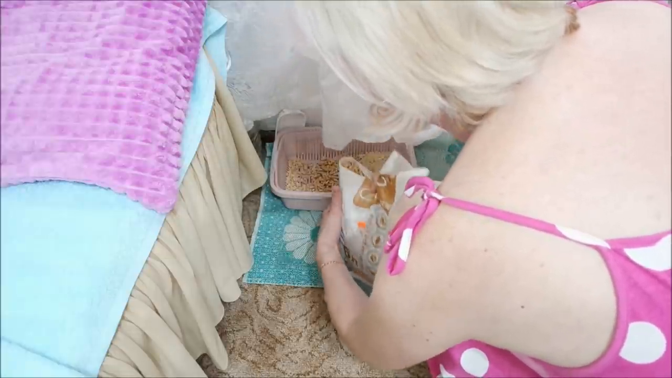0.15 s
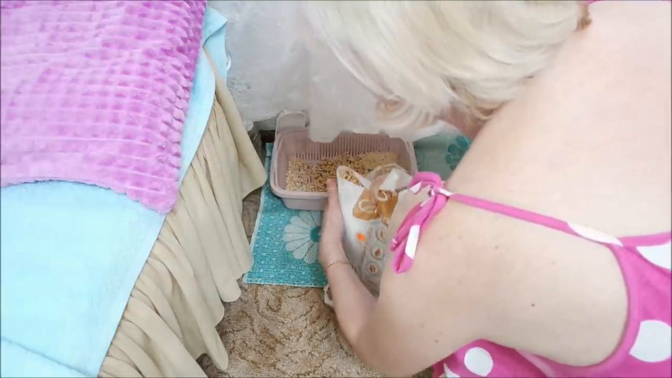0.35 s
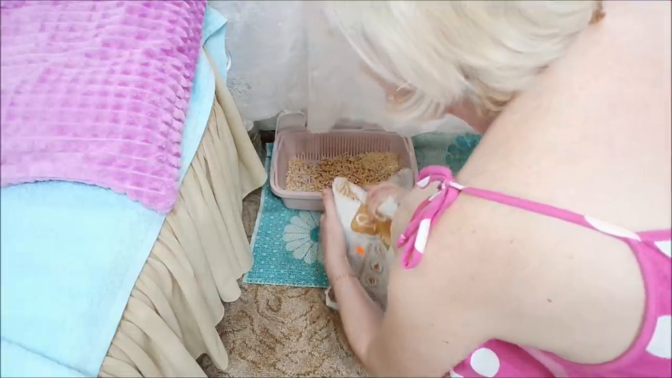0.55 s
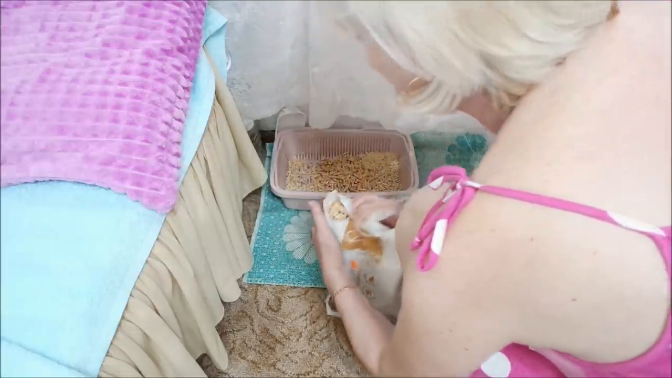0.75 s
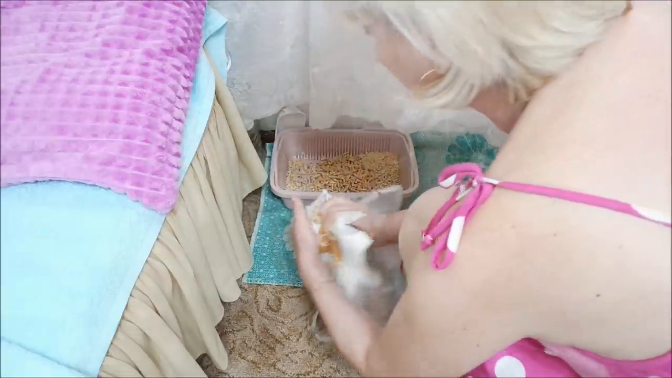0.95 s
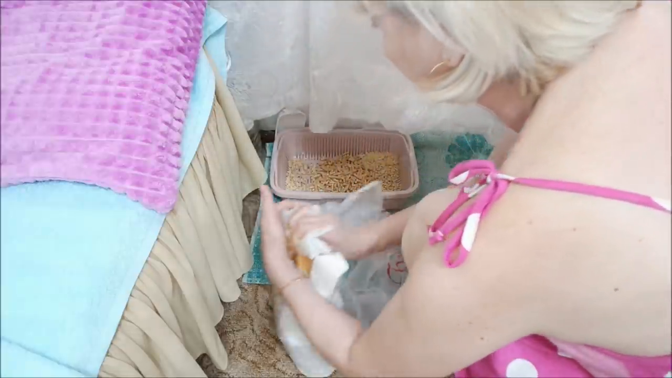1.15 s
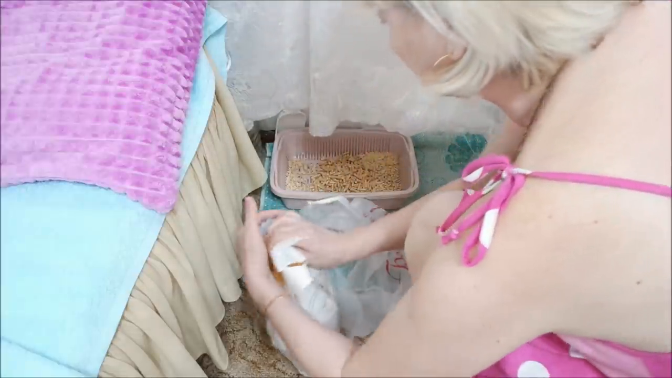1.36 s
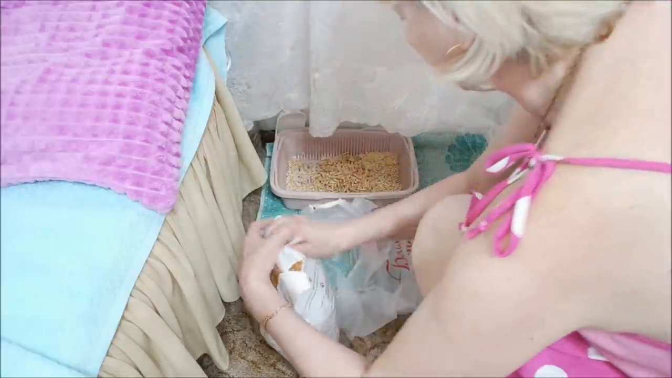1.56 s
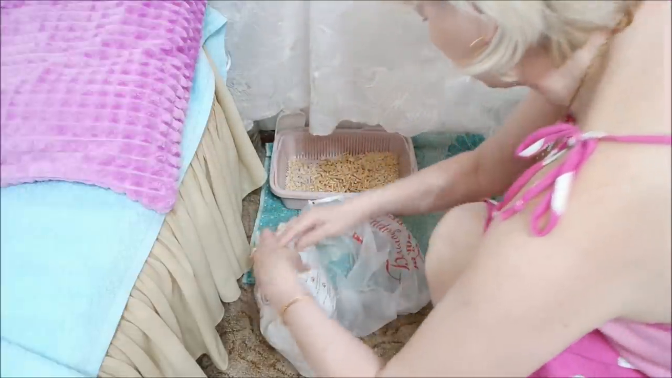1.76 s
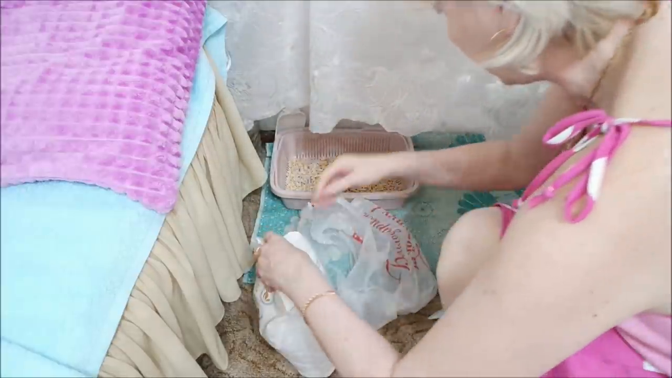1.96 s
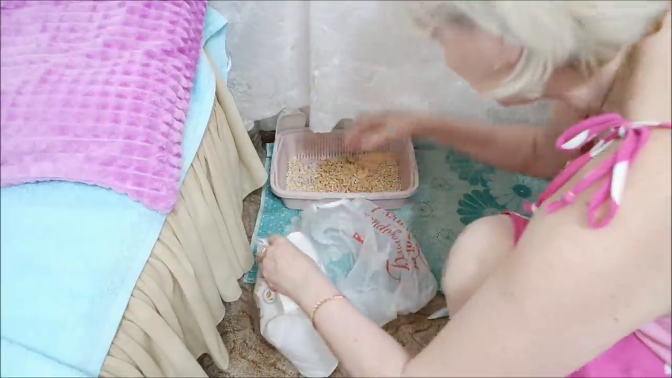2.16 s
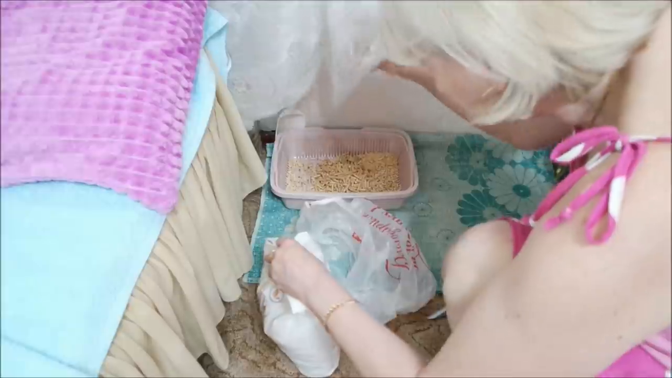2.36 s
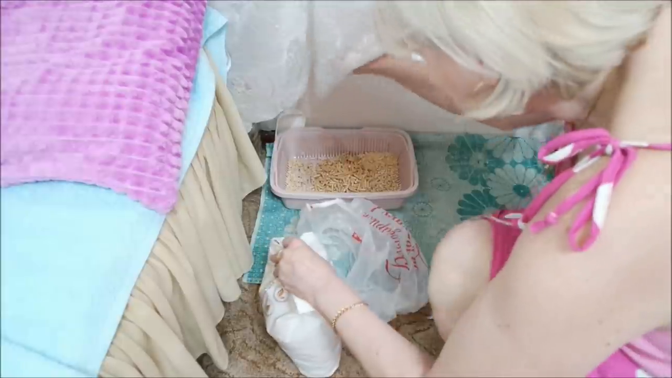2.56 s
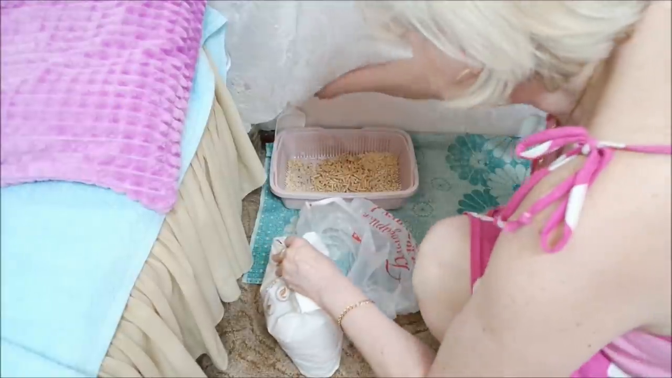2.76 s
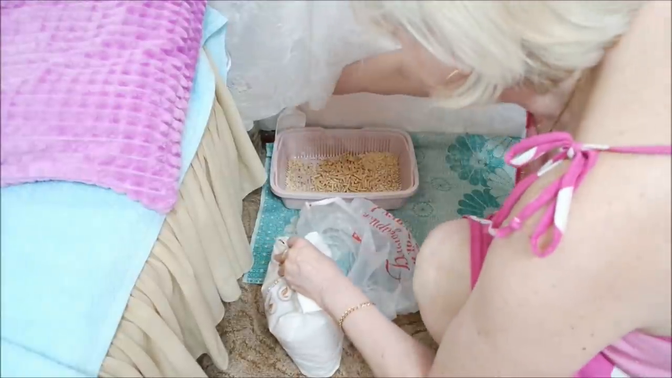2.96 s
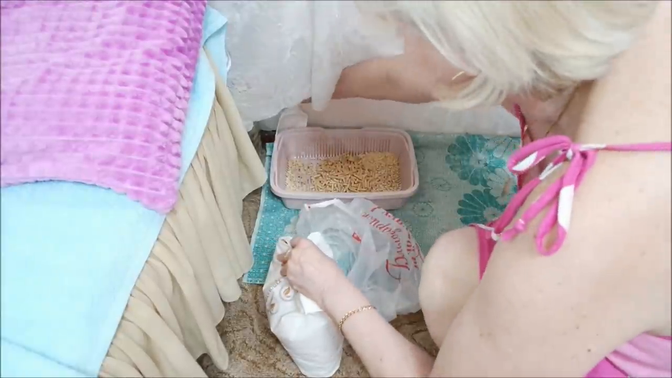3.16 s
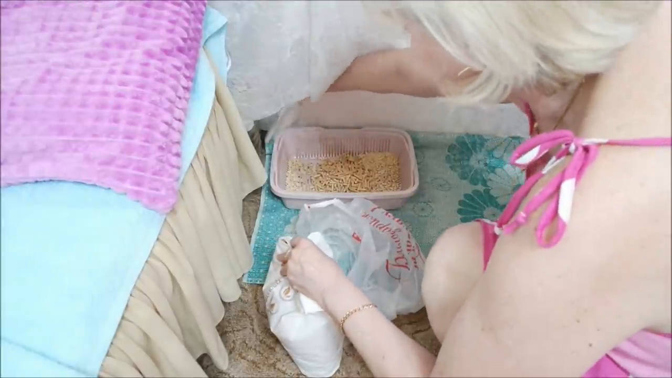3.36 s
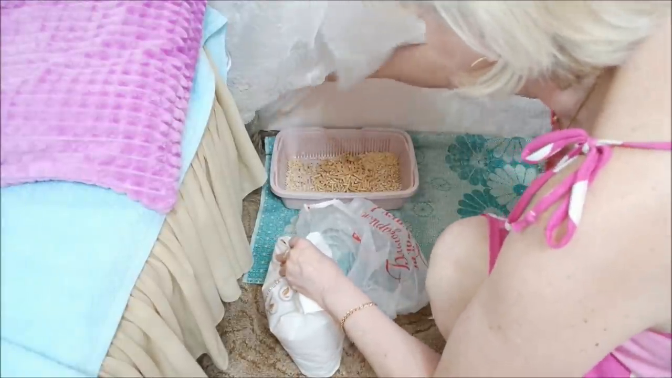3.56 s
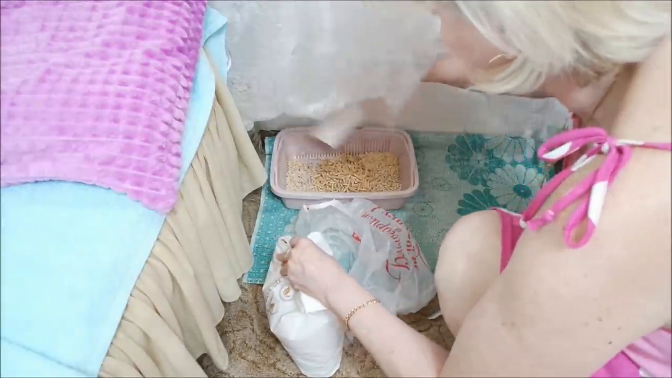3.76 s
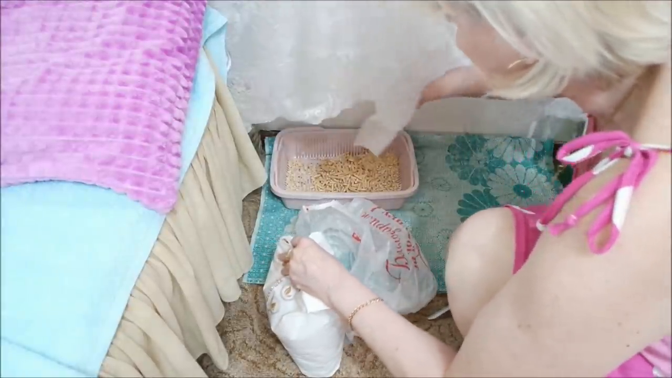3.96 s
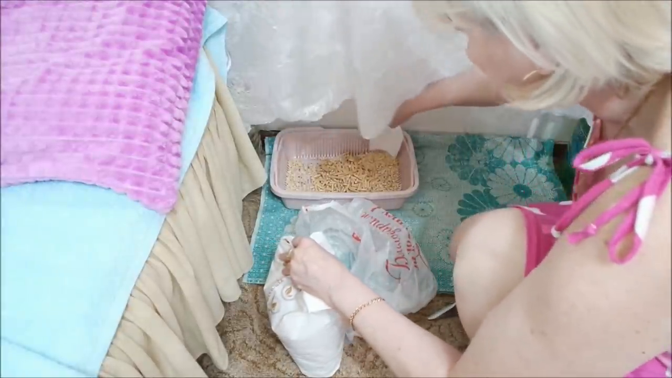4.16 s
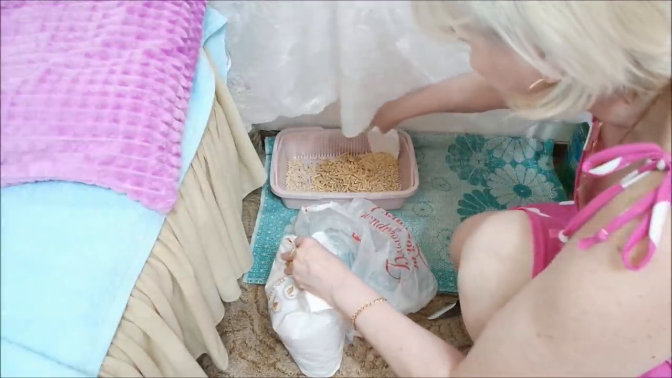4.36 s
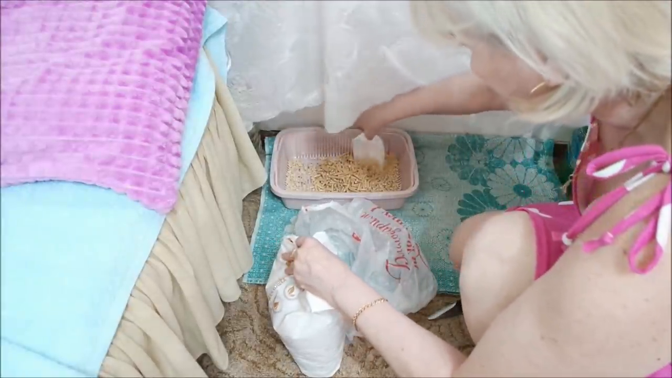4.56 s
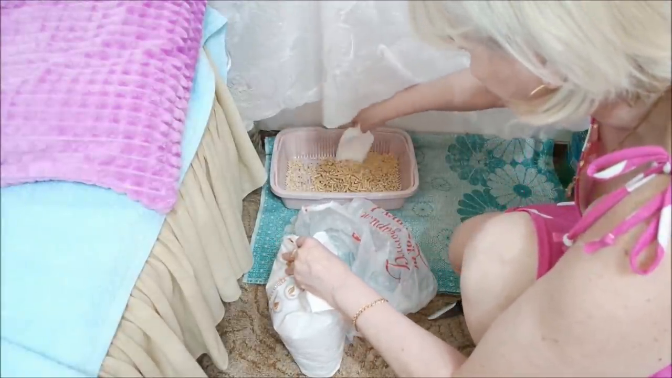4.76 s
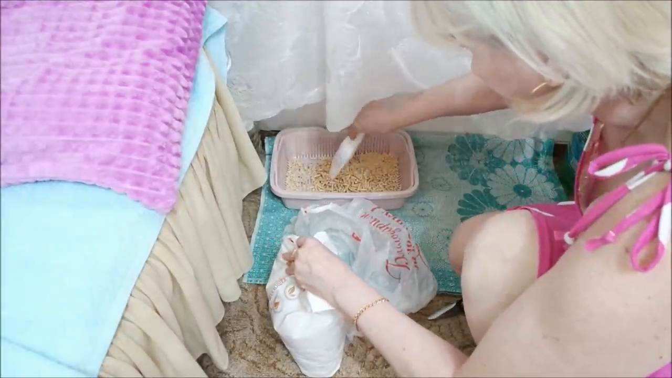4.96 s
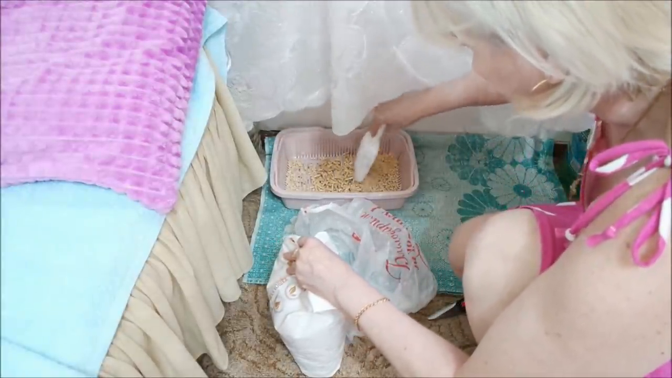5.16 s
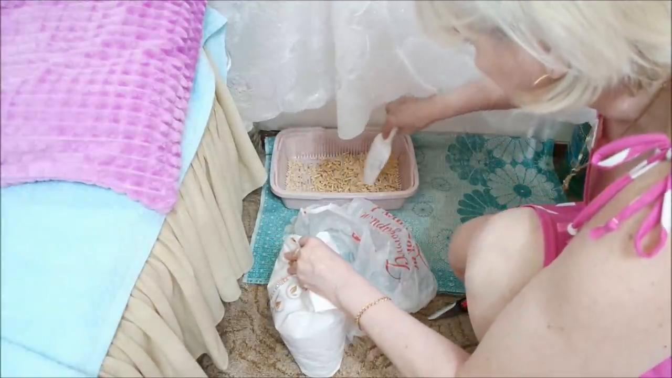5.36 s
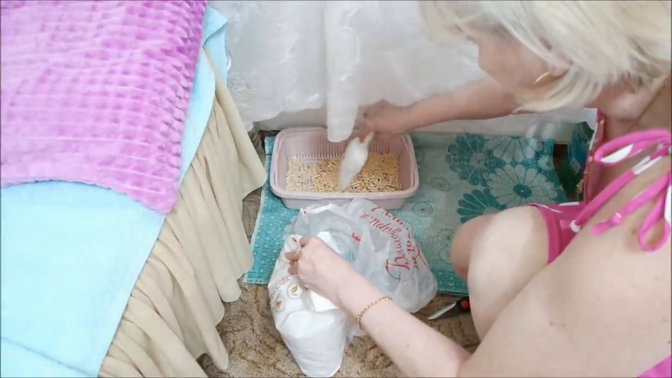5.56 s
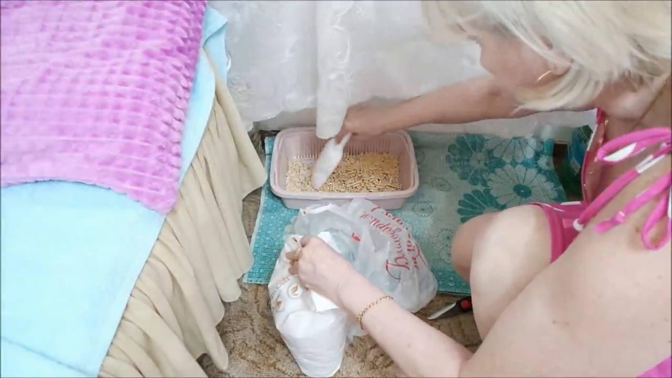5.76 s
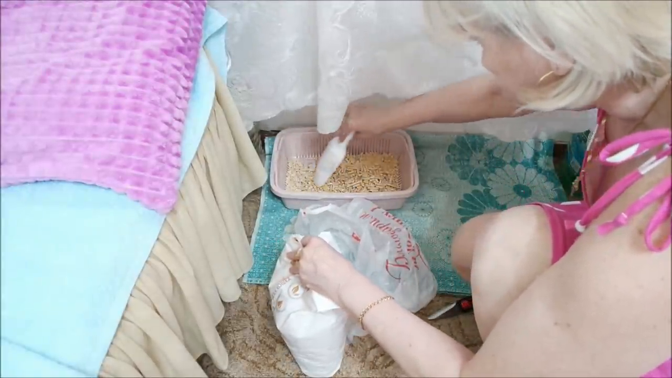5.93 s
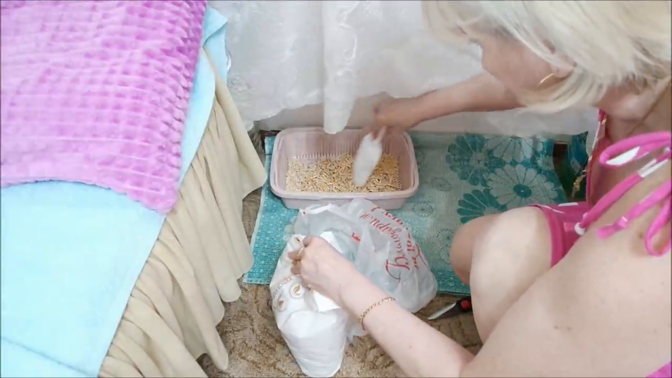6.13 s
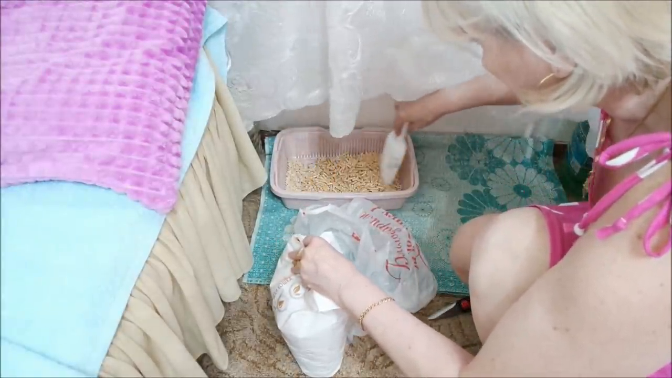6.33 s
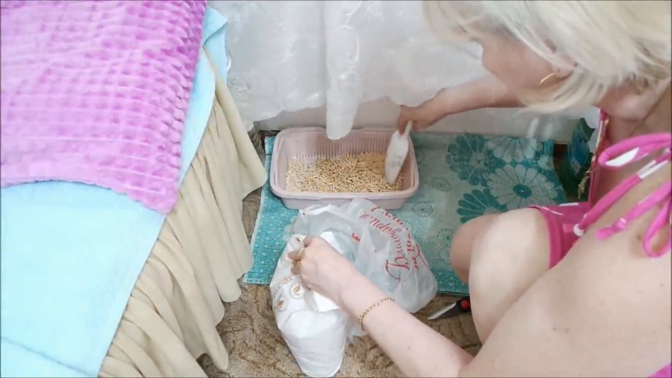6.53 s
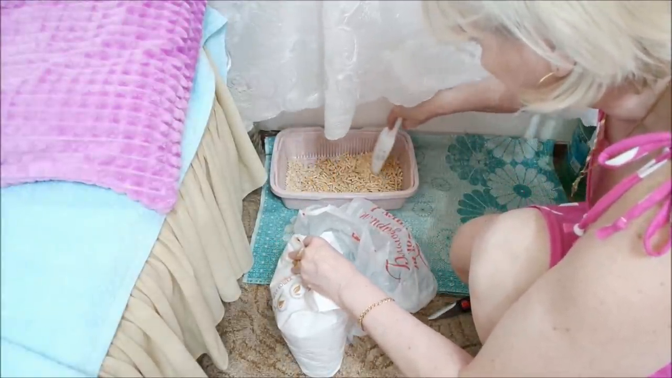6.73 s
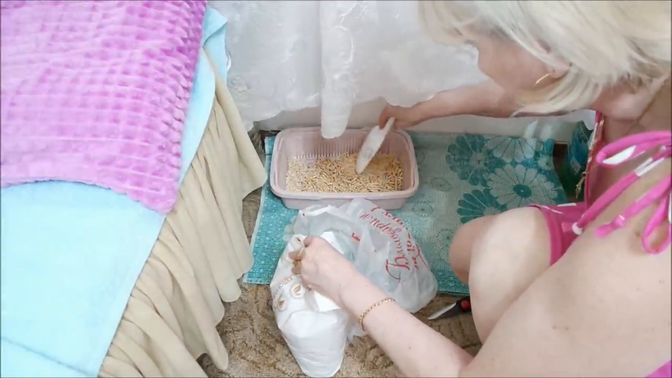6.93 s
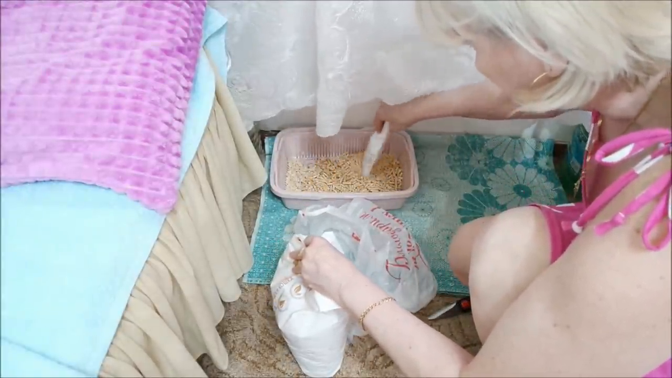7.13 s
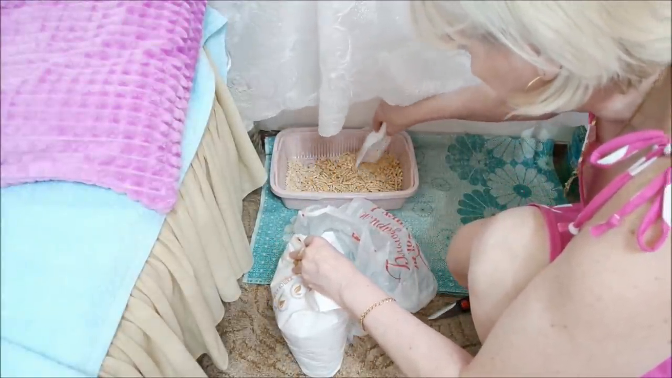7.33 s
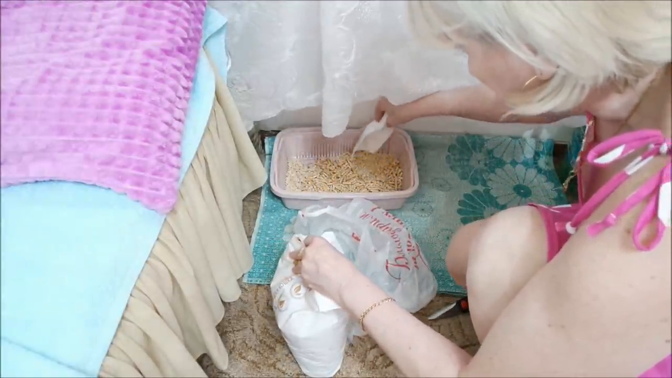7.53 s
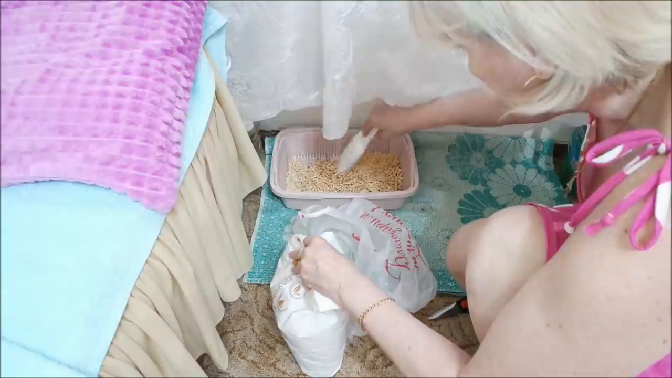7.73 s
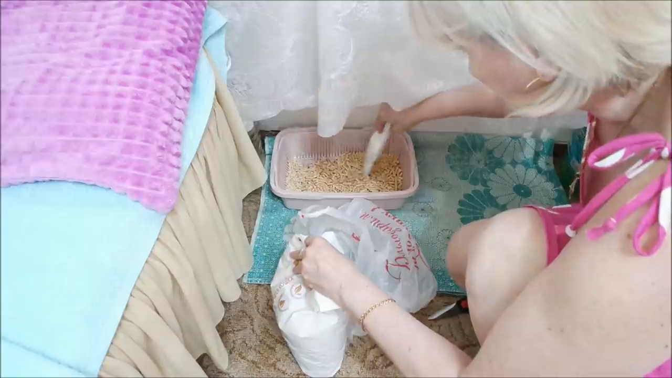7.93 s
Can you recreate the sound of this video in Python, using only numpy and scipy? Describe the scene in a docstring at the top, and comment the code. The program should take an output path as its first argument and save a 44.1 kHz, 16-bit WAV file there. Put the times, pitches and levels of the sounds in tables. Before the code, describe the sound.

A plastic bag rustles and snaps sharply as it is folded shut, then a scoop rakes dry litter pellets in a plastic tray.

```python
"""In a small furnished room with a faint mains hum, a plastic bag of cat litter is lowered and folded shut
beside a plastic tray: fine creases buckle as a rustle of tiny impacts, and stiff ones snap at a pitch.
The tray's shell knocks dully under bag and scoop, as filtered bursts. The scoop then rakes the pellets level
in short strokes: they clack on its resonances, slide as dense grains and rumble on the bottom as shaped noise.
The sources are close to one microphone, with decaying-noise reflections behind them."""
import sys
import numpy as np
from scipy import signal
from scipy.io import wavfile

SR = 44100
rng = np.random.default_rng(int(sys.argv[2]) if len(sys.argv) > 2 else 0)


def to_wav(sig):
    """Store sig (one row per channel, or 1-D mono) as 16-bit WAV at the path in sys.argv[1].

    Samples outside -1..1 are clipped; the rate is SR.
    """
    pcm = np.clip(np.atleast_2d(sig), -1, 1) * 32767
    pcm = np.round(pcm).astype(np.int16)
    wavfile.write(sys.argv[1], SR, pcm.T)  # frames by channels


N = 352359
TIME = np.arange(N) / SR  # s


def amp(db):
    """Decibel law: converts a level to an amplitude gain."""
    return 10 ** (np.asarray(db) / 20)


def evened(x):
    """Power normalisation: scales to rms 1."""
    return x / np.sqrt(np.mean(x ** 2) + 1e-20)


def blow(x):
    """Energy normalisation: gives a short sound the energy of 10 ms at rms 1."""
    return x * np.sqrt(SR / 100 / (np.sum(x ** 2) + 1e-20))


def read(points, hz):
    """Interpolation: reads a curve on a log-frequency axis."""
    point_hz, value = np.transpose(points)
    return np.interp(np.log(hz + 1), np.log(point_hz + 1), value)


def add(mix, start_s, sound):
    """Superposition: mixes a sound in at a time."""
    part = mix[max(round(start_s * SR), 0):][:len(sound)]
    part += sound[:len(part)]


def band(x, hz, kind, order=3):
    """Band limiting: a causal Butterworth filter."""
    return signal.sosfilt(signal.butter(order, np.minimum(hz, SR / 2 - 1), kind, fs=SR, output="sos"), x)


def colour(points, resonances=(), size=2048):
    """Minimum phase: the causal impulse response of a spectrum with resonances on top."""
    hz = abs(np.fft.fftfreq(size, 1 / SR))
    peaks_db = sum(lift / (1 + (2 * (hz - f) / width) ** 2) for f, width, lift in resonances)
    log_gain = np.log(amp(read(points, hz) + peaks_db))
    spectrum = np.exp(np.conj(signal.hilbert(log_gain)))  # the phase follows from the log gain
    return np.fft.ifft(spectrum).real[:size // 2]


def through(x, response):
    """Linear response: convolves, keeping the length."""
    return signal.oaconvolve(x, response)[:len(x)]


def burst(decay_s, spike, rise_s=0.0001, size=2048):
    """Impact excitation: one sharp spike and the jagged flutter that builds and dies after it."""
    t = TIME[:size]
    jagged = amp(5.5 * rng.standard_normal(size))  # random gain from sample to sample
    envelope = np.exp(-t / decay_s) * (1 - np.exp(-t / rise_s))
    flutter = jagged * rng.standard_normal(size) * envelope
    flutter /= np.linalg.norm(flutter)
    flutter[0] += spike
    return flutter


def tinted(x, hz, ring, width=0.15):
    """Size resonance: each crease or pellet has a size of its own and favours a pitch of its own."""
    pitched = band(x, [hz / (1 + width), hz * (1 + width)], "bandpass", order=1)
    return blow(blow(x) + ring * blow(pitched))


def grains(per_s, spread_db, decay_s, spike, ring, body, count=40):
    """Granular superposition: random tiny impacts of many pitches heard through a body, few of them large."""
    at = rng.integers(0, N, int(per_s * N / SR))
    sizes = amp(spread_db * np.minimum(rng.exponential(1, len(at)), 3.5))
    shapes = []
    for hz in np.geomspace(900, 11000, count):
        impact = tinted(burst(decay_s, spike, size=768), hz, ring)
        shapes.append(through(impact, body()))
    out = np.zeros(N)
    for start, size, shape in zip(at, sizes, rng.integers(0, count, len(at))):
        add(out, start / SR, size * shapes[shape])
    return evened(out)


def effort(moves, rise_db_per_s, sag_db_per_s, fall_db_per_s):
    """Power summation of hand movements: each swells up to its start, sags while it lasts and then dies away."""
    power = np.zeros(N)
    for start_s, length_s, db in moves:
        early = np.maximum(start_s - TIME, 0)
        held = np.clip(TIME - start_s, 0, length_s)
        late = np.maximum(TIME - start_s - length_s, 0)
        level_db = db - rise_db_per_s * early - sag_db_per_s * held - fall_db_per_s * late
        power += amp(np.maximum(level_db, -140)) ** 2
    return np.sqrt(power)


# spectrum of the still air, relative: frequency_hz, level_db (per Hz)
AIR_SPECTRUM = [(25, -13), (150, -11), (500, -18), (1500, -24.5), (15000, -32.5)]


def room_tone(air_db=-70, hum_db=-73, hum_hz=49):
    """Stationary background: still air as shaped noise, and a low mains hum as a sine."""
    air = evened(through(rng.standard_normal(N), colour(AIR_SPECTRUM, size=8192)))
    hum = evened(np.sin(2 * np.pi * hum_hz * TIME))
    return amp(air_db) * air + amp(hum_db) * hum


# spectrum of the crinkling film, relative: frequency_hz, level_db (per Hz)
FILM_SPECTRUM = [(50, -8.5), (140, -2.5), (380, 1), (1000, -6), (4500, -8), (7000, -11), (14500, -9)]


def crackle():
    """Buckling statistics: tiny creases buckle densely, with a scatter of larger, pitched ones standing out."""
    def film():
        return colour(FILM_SPECTRUM)

    fine = grains(per_s=2400, spread_db=0.5, decay_s=0.002, spike=0.38, ring=0.17, body=film)
    coarse = grains(per_s=170, spread_db=2.7, decay_s=0.0012, spike=0.7, ring=1.3, body=film)
    return fine + coarse


# the hands grip and fold the bag: start_s, length_s, level_db (relative, of the rustle)
BAG_GRIPS = [(0, 0.27, -35), (.4, 0.16, -41), (.62, 0.22, -50), (.81, 0.15, -35), (1.035, 0.089, -27.5),
             (1.17, 0.091, -33), (1.36, 0.071, -35.5), (1.57, 0.66, -37), (1.78, 0.22, -34),
             (2.13, 0.16, -45.5), (2.43, 0.021, -46.5), (3.42, 0.021, -66.5)]
# the film tightens, yields under the hand, then relaxes
GRIP_RISE_DB_PER_S, GRIP_SAG_DB_PER_S, RELAX_DB_PER_S = 326, 12, 109


def rustle(body_db=-1.0, fizz_db=-12.5, taut=0.75, slack_db=-3):
    """Modulated crackling: creases buckle as the hands work the bag; the fizz swells less than the body."""
    grip = effort(BAG_GRIPS, GRIP_RISE_DB_PER_S, GRIP_SAG_DB_PER_S, RELAX_DB_PER_S)
    crinkle = crackle()
    body = evened(band(crinkle, 5400, "low"))
    fizz = evened(band(crinkle, 4800, "high"))
    slack = slack_db * (TIME > 1.3)  # the film slackens once the bag stands
    return amp(body_db) * grip * body + amp(fizz_db + slack) * grip ** taut * fizz


# creases of the bag snapping through: start_s, level_db, treble_db (against the middle), pitch_hz
CREASE_SNAPS = [(0.001, -22, -5.5, 2107), (0.071, -33.5, -11, 2380), (0.114, -33.5, -1.5, 2400),
                (0.203, -33, -2, 990), (0.366, -32, -2, 3180), (0.39, -24.5, -0.5, 1480),
                (0.509, -27, -5.5, 5110), (0.783, -28, -17, 1000), (0.815, -25, -2.5, 1402),
                (0.893, -30.5, 3, 1500), (0.935, -32, -14, 3126), (0.955, -37, 5.5, 4710),
                (1.028, -26, 1, 4630), (1.085, -25.0, -4.5, 1665), (1.096, -21.5, 6, 9040),
                (1.133, -22.5, 4.5, 11740), (1.228, -23.5, -4, 1340), (1.327, -25, -7.5, 2480),
                (1.419, -46.5, 10.5, 2670), (1.553, -29.5, -11, 3065), (1.599, -30.5, -3, 2680),
                (1.644, -34, -11, 3740), (1.673, -49.5, 18.5, 10800), (1.688, -32, -8, 2730),
                (1.763, -32, -1, 2150), (1.813, -24.5, -6.5, 1930), (1.876, -35.5, -9.5, 2300),
                (1.895, -28, -5, 2344), (1.996, -21, 1.5, 2620), (2.028, -23, -0.5, 2150),
                (2.144, -27, 2.5, 2608), (2.23, -36, -6, 5160), (2.242, -25.5, 0.5, 1091),
                (2.401, -36, -5, 1571), (2.449, -39.0, -23.5, 2900), (2.491, -37.5, 2.5, 2417),
                (2.547, -27.5, 0.5, 1150), (2.636, -40, -8, 5100), (2.709, -36, -1, 884),
                (2.76, -47.5, -3, 940), (2.801, -42, -2, 960), (2.879, -53, -7.5, 2320),
                (2.919, -58, -24, 870), (3.406, -44.5, -7, 2440)]
# snaps thin out as the folding moves up to the empty top of the bag
SNAP_BASS_DB, SNAP_BASS_DB_PER_S = -4.5, -3.5


def snaps(ring=0.55):
    """Snap-through: a stiff crease flips and the sheet rings for a few milliseconds at the crease's pitch."""
    out = np.zeros(N)
    for start_s, level_db, treble_db, pitch_hz in CREASE_SNAPS:
        crack = burst(decay_s=0.0036, spike=0.3, rise_s=0.0013)
        middle = tinted(band(crack, [720, 5000], "bandpass", order=2), pitch_hz, ring)
        top = blow(band(burst(decay_s=0.0028, spike=0.24), 5600, "high", order=2))
        low = blow(band(crack, [330, 1250], "bandpass", order=2))
        bass_db = SNAP_BASS_DB + SNAP_BASS_DB_PER_S * start_s
        add(out, start_s, amp(level_db) * (middle + amp(treble_db) * top + amp(bass_db) * low))
    return out


# hollow knocks and light bounces of bag and scoop on the tray: start_s, level_db, pitch_hz, t60_s
TRAY_KNOCKS = [(.003, -33, 680, 0.28), (.392, -29.5, 250, 0.35), (.785, -32, 980, 0.096),
               (0.817, -29.5, 334, 0.066), (1.228, -37.5, 228, 0.17), (2.71, -35, 600, 0.27),
               (2.719, -45.5, 148, 0.16), (3.158, -49.5, 2390, 0.013), (4.5302, -27, 990, 0.03),
               (4.584, -40.5, 2540, .04), (4.6617, -40.5, 2680, 0.023), (5.747, -38, 670, 0.33),
               (6.495, -39.5, 430, 0.11), (7.1, -41, 189, 0.14), (7.626, -48.5, 735, 0.061)]
# modes of the plastic: pitch_ratio (multiple of the knock's pitch), lift_db
SHELL_MODES = [(0.859, -1), (1.141, 5)]


def knocks(width=0.1, skirt_db=-13, far_db=-48):
    """Damped shell modes: the plastic, damped by the litter in it, gives a broad, dry clack."""
    out = np.zeros(N)
    for start_s, level_db, hz, t60_s in TRAY_KNOCKS:
        skirts = [(hz / 5, 2 * skirt_db), (hz / 2, skirt_db / 2), (hz, 0), (hz * 1.4, skirt_db), (hz * 4, far_db)]
        shell = colour(skirts, [(hz * ratio, hz * width, lift) for ratio, lift in SHELL_MODES])
        impact = burst(t60_s / np.log(1000), spike=0.94, size=8192)
        add(out, start_s, amp(level_db) * blow(through(impact, shell)))
    return out


# spectrum of the pellets, relative: frequency_hz, level_db (per Hz)
PELLET_SPECTRUM = [(200, -28.5), (700, -5.5), (3000, -6), (5200, -5.5), (7000, -11), (15000, -16.5)]
# resonances of the unloaded scoop: frequency_hz, width_hz, lift_db
SCOOP_MODES = [(1643, 98, 8), (2770, 380, 11), (4500, 560, 7)]


def scoop(load):
    """Loaded resonance: pellets lying against the scoop shift each mode at random, by about the share load."""
    modes = [(hz * np.exp(load * rng.standard_normal()), width, lift) for hz, width, lift in SCOOP_MODES]
    return colour(PELLET_SPECTRUM, modes)


# pellets striking the scoop: start_s, level_db (relative), treble_db (relative, against the middle)
PELLET_CLACKS = [(4.253, -48.5, -29), (4.474, -46, -31), (4.5297, -20, -20), (4.6161, -17.5, -40),
                 (4.907, -40, -45), (4.9505, -28.5, -40), (5.038, -21, -21), (5.0472, -24.5, -14.5),
                 (5.091, -23, -7), (5.114, -23, -26), (5.354, -35.5, -12.5), (5.415, -39, -24),
                 (5.5087, -23.5, -24), (5.5606, -19, -26), (5.597, -19.5, -25), (5.624, -17, -23),
                 (5.6321, -16, -15.5), (5.638, -26.5, -11), (5.66, -29, -8), (5.807, -31, -20),
                 (5.818, -34, -17), (5.9669, -20.5, -35), (5.975, -20.5, -26), (6.081, -31, -33),
                 (6.151, -14.5, -27), (6.1609, -5.5, -29), (6.2421, -18, -19), (6.2725, -7.5, -22.5),
                 (6.324, -12.5, -24), (6.366, -21.5, -40), (6.403, -20.5, -41), (6.4245, -22.5, -13.5),
                 (6.4658, -20, -30), (6.6216, -20, -18.5), (6.696, -23.5, -13), (6.905, -36.5, -23.5),
                 (7.0813, -22.5, -23), (7.098, -9, -19), (7.141, -25, -21), (7.2, -23, -30.5),
                 (7.235, -16.5, -30), (7.274, -17.5, -25.5), (7.668, -45, -19), (7.751, -43, -30),
                 (7.805, -30, -28), (7.8324, -8.5, -23), (7.95, -22, -16.5)]
# a harder blow rattles longer: decay at a table level of 0 dB, and the level step that doubles it
SCATTER_S, SCATTER_DB_PER_DOUBLING = 0.0097, 24


def clacks(level_offset_db=-15.0, bright_offset_db=11):
    """Stick-slip release: a jammed pellet hits the scoop and scatters its neighbours; hard contact adds a tick."""
    out = np.zeros(N)
    for start_s, level_db, bright_db in PELLET_CLACKS:
        decay_s = SCATTER_S * 2 ** (level_db / SCATTER_DB_PER_DOUBLING)
        rattle = burst(decay_s, spike=0.54, rise_s=0.00071)
        hit = through(rattle, scoop(load=0.05))
        ring = blow(band(band(hit, 1500, "high", order=1), 4930, "low"))
        tick = blow(band(hit, 6760, "high"))
        sound = ring + amp(bright_db + bright_offset_db) * tick
        add(out, start_s, amp(level_db + level_offset_db) * sound)
    return out


# pushes of the scoop through the litter: start_s, length_s, level_db (relative, of the sliding pellets)
SCOOP_STROKES = [(4.542, 0.11, -50), (4.957, 0.019, -49), (5.035, 0.069, -46), (5.1, 0.021, -36.5),
                 (5.36, 0.36, -53), (5.535, 0.073, -44.5), (5.575, 0.071, -36), (5.725, 0.014, -39),
                 (6.146, 0.17, -40), (6.365, 0.072, -43.5), (6.475, 0.0082, -33), (6.62, 0.15, -52),
                 (7.065, .03, -48.5), (7.102, 0.011, -34), (7.15, 0.13, -45), (7.83, 0.086, -33.5)]
# spectrum of the loaded tray bottom, relative: frequency_hz, level_db (per Hz)
BOTTOM_SPECTRUM = [(40, -3), (130, -1.5), (400, -1.5), (900, -5), (1700, -36)]
# the scoop bites in, slows, and the heap comes to rest
BITE_DB_PER_S, STROKE_SAG_DB_PER_S, SETTLE_DB_PER_S = 2790, 4.5, 331
# a few pellets keep rolling after each push
TRICKLE_DB, TRICKLE_DB_PER_S = -9, 101.5


def raking(slide_db=-0.5, rumble_db=-18.0, weight=0.8):
    """Granular friction: pellets slide and tumble; the tray bottom rumbles even under a slow stroke."""
    push = effort(SCOOP_STROKES, BITE_DB_PER_S, STROKE_SAG_DB_PER_S, SETTLE_DB_PER_S)
    rolling = effort(SCOOP_STROKES, BITE_DB_PER_S, STROKE_SAG_DB_PER_S, TRICKLE_DB_PER_S)
    speed = np.hypot(push, amp(TRICKLE_DB) * rolling)
    slide = grains(per_s=750, spread_db=4.8, decay_s=0.0009, spike=0.8, ring=0.5, body=lambda: scoop(load=0.12))
    rumble = evened(through(rng.standard_normal(N), colour(BOTTOM_SPECTRUM)))
    return amp(slide_db) * speed * slide + amp(rumble_db) * speed ** weight * rumble


# reverberation of the small furnished room: frequency_hz, t60_s
ROOM_DECAY = [(150, 0.63), (530, 0.22), (1400, 0.22), (3700, 0.13)]


def room(x, gap_s=0.0028):
    """Diffuse reverberation: dense reflections after a short gap, each band dying at its own speed."""
    taps = rng.standard_normal(SR // 2) * (TIME[:SR // 2] > gap_s)
    hz, t, z = signal.stft(taps, SR, nperseg=256)
    decay = np.exp(-np.log(1000) * t / read(ROOM_DECAY, hz)[:, None])
    tail = signal.istft(z * decay, SR, nperseg=256)[1]
    return through(x, tail / np.linalg.norm(tail))


def rotated_room(x, turns_per_s=4.7):
    """Time-varying diffusion: two random tails trade places at a fixed rate,
    so that the reverberation does not ring on steady lines."""
    angle = 2 * np.pi * turns_per_s * TIME
    return room(x * np.cos(angle)) + room(x * np.sin(angle))


def scene(bag_room_db=-5, tray_room_db=-7, knock_room_db=-10):
    """Direct and reverberant field: bag and tray close to the microphone, with the room behind them."""
    background = room_tone()
    bag = rustle() + snaps()
    shell = knocks()
    pellets = clacks() + raking()
    sent = amp(bag_room_db) * bag + amp(tray_room_db) * pellets + amp(knock_room_db) * shell
    return (bag + pellets + shell + rotated_room(sent) + background)[None]


def record(dry, edge_hz=15250):
    """Band limitation: the recorder passes only what lies below its upper edge."""
    lowpass = signal.firwin(301, edge_hz, window=("kaiser", 8), fs=SR)
    return signal.oaconvolve(dry, lowpass[None], "same")


dry = scene()
out = record(dry)
to_wav(out)
```